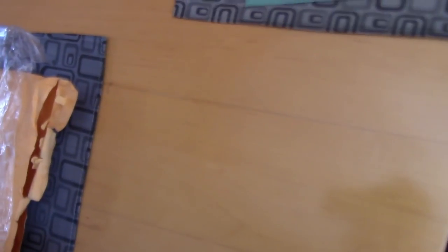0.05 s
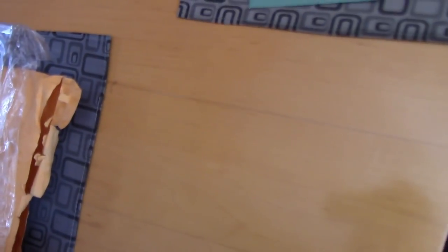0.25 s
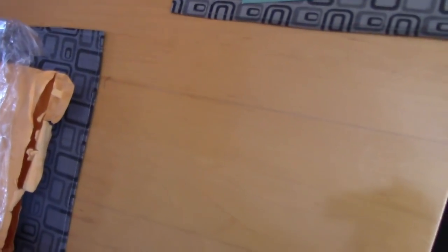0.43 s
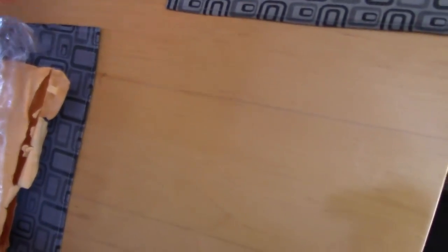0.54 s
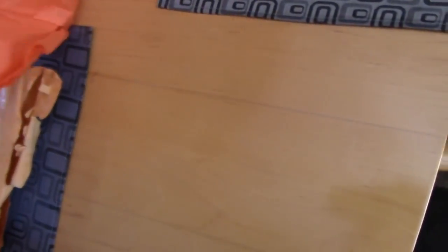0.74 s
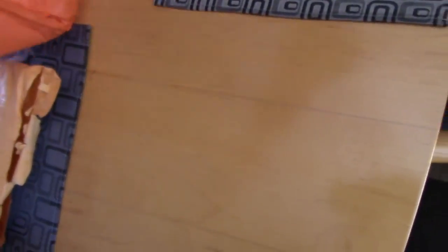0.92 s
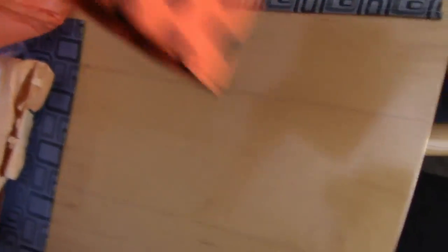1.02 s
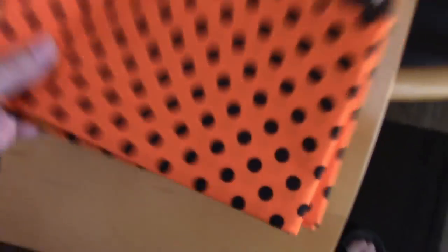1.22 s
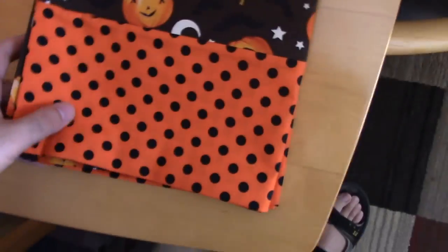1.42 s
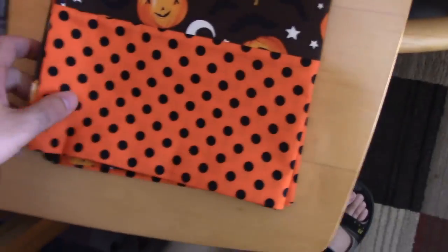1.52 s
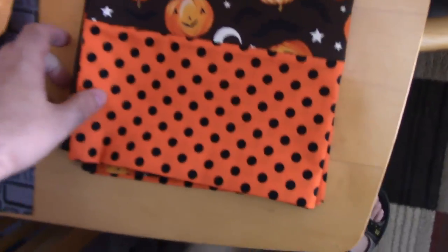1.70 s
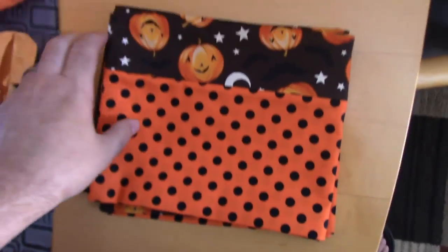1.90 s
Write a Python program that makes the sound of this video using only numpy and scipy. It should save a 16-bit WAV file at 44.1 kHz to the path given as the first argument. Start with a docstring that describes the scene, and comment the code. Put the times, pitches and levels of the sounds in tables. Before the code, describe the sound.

Fabric rasps and flaps softly as it is pulled from a pile in a small, quiet room. The rustle fades, then hand and cloth land on a wooden table with one quick knock and settle.

```python
"""A small, quiet room with a wooden table. A folded piece of stiff cotton is pulled from a pile and carried
over the table. Stick-slip friction makes the weave rasp, while buckling makes the folds flap and the
creases snap. The hand lands with the cloth in a quick double knock that excites the modes of the table
top, and the cloth settles with a faint brush. A noise suppressor thins the faint parts."""
import sys
import numpy as np
from scipy import signal
from scipy.fft import rfft, irfft
from scipy.io import wavfile
from scipy.ndimage import uniform_filter1d, minimum_filter1d

SR = 44100
rng = np.random.default_rng(int(sys.argv[2]) if len(sys.argv) > 2 else 0)


def bounce(signal):
    """Save signal as a 16-bit WAV file at the path given by the first command-line argument."""
    frames = np.transpose(np.atleast_2d(signal))
    limited = np.clip(frames, -1, 1)
    pcm = np.round(limited * 32767).astype(np.int16)
    wavfile.write(sys.argv[1], SR, pcm)


N = 85995

# Envelopes of the rubbing weave and the flapping folds: time_s, relative_level_db
RUB_ENVELOPE = [(0.0, -30), (0.064, -37), (0.096, -31.5), (0.238, -32), (0.252, -24), (0.298, -30.5),
                (0.324, -26), (0.398, -26), (0.416, -17), (0.456, -23.5), (0.492, -24), (0.508, -15),
                (0.544, -18.5), (0.556, -31), (0.676, -56.5), (0.732, -46.5), (0.743, -36), (0.748, -23.5),
                (0.77, -20), (0.866, -40), (0.934, -41), (0.962, -36.5), (0.976, -30.5), (1.008, -31.5),
                (1.02, -38), (1.32, -57), (1.45, -100)]
FLAP_ENVELOPE = [(0.0, -43), (0.1, -51), (0.27, -49), (0.318, -42), (0.408, -40), (0.474, -43),
                 (0.514, -31.5), (0.578, -55.5), (0.66, -61), (0.756, -44.5), (0.904, -53), (1.122, -49.5),
                 (1.4, -58)]
# Spectra of the noisy sounds: frequency_hz, relative_level_db
RUB_SPECTRUM = [(300, -43), (680, -17.5), (880, -4.5), (1450, 0), (2070, -5), (2750, 0), (3900, -3.5),
                (4700, -1), (6500, -5), (10300, -9.5), (13000, -16.5), (15500, -30.5)]
FLAP_SPECTRUM = [(60, -31), (160, -15.5), (255, 0.5), (400, -1.5), (640, -9), (890, -2), (1300, -29.5),
                 (3000, -52.5)]
HOLLOW_SPECTRUM = [(60, -40), (260, -8.5), (520, -12), (760, 8), (900, -13.5), (4000, -60)]  # the cloth leaves the pile
SCRAPE_SPECTRUM = [(600, -20), (1200, -5), (4000, -3), (11000, 4.5), (15000, -13)]  # the last corner scrapes free
SLIDE_SPECTRUM = [(100, -24), (440, -0.5), (730, -11.5), (895, 2.5), (1100, -7), (1460, 10.5), (1750, -4.5),
                  (2200, -13.5), (5000, -14.5), (15000, -48.5)]  # fingers slide on it
BRUSH_SPECTRUM = [(300, -21.5), (3800, -15.5), (5100, 9), (6300, -9), (8000, -0.5), (15000, -25.5)]  # it is lowered
SWISH_SPECTRUM = [(30, -17.5), (200, 1), (620, 5.5), (1500, -12), (2200, -1), (5000, -14.5), (15000, -35.5)]  # noise swells just before the knock and fades under it
THUD_SPECTRUM = [(40, -17.5), (87, 1.5), (170, -1.5), (450, 8), (620, -10), (3000, -62)]  # the layers come down
SETTLE_SPECTRUM = [(100, -6), (272, 10), (750, -17.5), (1100, 6), (1650, 13), (2000, 7), (3050, 5.5),
                   (3700, -14), (5200, -4), (6500, -10), (15000, -23.5)]
TRAIL_SPECTRUM = [(600, -24), (1100, -1), (1600, 2), (2300, -12)]  # the fingers trail off
BACKGROUND_SPECTRUM = [(40, -13), (280, -2.5), (1100, -11.5), (15000, -41)]
# Soft, low bumps, the last two faint ones as the hand lets go: start_s, level_db, pitch_hz, t60_s
BUMPS = [(0.089, -42.5, 271.1, .3), (0.178, -43.5, 420.4, .3), (.21, -43, 560, .25), (.405, -35, 742, .14),
         (.498, -23.5, 272.5, .15), (.503, -20.5, 342.6, .14), (.742, -35, 401.7, .25),
         (.785, -39.5, 315.4, .2), (.91, -44.5, 388, 0.32), (.98, -47, 640, 0.26), (1.086, -38, 552.6, .3),
         (1.092, -43, 226, .18), (1.2, -43.5, 437, .4), (1.3, -48, 420.9, 0.83), (1.689, -48, 169, .3),
         (1.879, -45, 278.3, 0.197)]
# Light strokes of the cloth and the swish: start_s, attack_s, hold_s, release_t60_s, level_db
STROKES = [ (.245, 0.15, 0.072, 0.37, -37), (1.064, 0.0043, 0.0043, 0.028, -40.5),
           (1.072, 0.017, 0.13, 0.64, -43.5), (1.283, 0.0057, 0.02, 0.34, -53),
           (1.372, 0.02, 0.014, 0.23, -27), (1.392, 0.033, 0.095, 0.17, -39),
           (1.532, 0.027, 0.05654, 0.22, -41), (1.66, 0.011, 0.042, 0.22, -51), ]
# Crease snaps: start_s, level_db, pitch_hz
SNAPS = [(0.328, -7, 4560), (0.371, -7, 5000), (0.768, -6, 3100), (0.828, -22.5, 1445),
         (1.033, -22.5, 2590), (1.103, -34, 1383), (1.128, -36, 1510), (1.171, -32, 1470)]
# A padded blow, a hard one and two light rebounds: start_s, gain_db, contact_bandwidth_hz
BLOWS = [(1.3951, 4, 1670), (1.4011, -2, 10180), (1.4141, -15.5, 3800), (1.4349, -14, 5000)]
# Modes of the table top: frequency_hz, relative_level_db, t60_s
TABLE_MODES = [(262.8, -23, 0.28), (439.3, -17.5, 0.14), (596, -15.5, 0.0966), (722, -4.5, 0.021),
               (910.8, -3, 0.011), (1089, -15.5, 0.11), (1270, -8, 0.025), (1794, -4.5, 0.01),
               (3030, -11.5, 0.0078), (4500, -6, 0.0036), (7160, -6, 0.0014)]
# Reverberation time of the room: frequency_hz, t60_s
ROOM_T60 = [(100, 0.32), (300, 0.5056), (700, 0.4722), (1300, 0.475), (3000, 0.58), (8000, 0.56)]
# Spectrum of the reverberation: frequency_hz, relative_level_db
ROOM_SPECTRUM = [(80, -3.5), (270, -4), (500, 11), (800, 0), (1500, 0.5), (3000, -0.5), (12000, -4.5)]
# Nominal threshold of the noise suppressor: frequency_hz, level_db
GATE_THRESHOLD = [(60, -67), (270, -63.5), (480, -57), (700, -54.5), (1050, -69), (1600, -66), (2100, -64),
                  (3000, -70), (4100, -62), (5200, -72), (15000, -86)]


def undb(db):
    """Amplitude ratio of a level in decibels."""
    return 10 ** (np.asarray(db) / 20)


def unit(x):
    """Normalisation to an rms of 1."""
    return x / np.sqrt(np.mean(x ** 2) + 1e-18)


def clock():
    """Time of every sample in seconds."""
    return np.arange(N) / SR


def decay(age, t60):
    """Exponential damping: 60 dB lost in t60 seconds."""
    return np.exp(-np.log(1000) * age / t60)


def along(table, at):
    """Linear interpolation in a two-column table."""
    return np.interp(at, *np.array(table, float).T)


def on_log(points, hz):
    """Interpolation on a logarithmic frequency axis."""
    freqs, values = np.array(points, float).T
    return np.interp(np.log(np.maximum(hz, 1)), np.log(freqs), values)


def colour(x, spectrum):
    """Zero-phase filtering by a spectral envelope."""
    size = 2 * len(x)
    gain = undb(on_log(spectrum, np.fft.rfftfreq(size, 1 / SR)))
    return irfft(rfft(x, size) * gain, size)[:len(x)]


def wander(rate_hz):
    """Random modulation: interpolated Gaussian steps with an rms of 1."""
    steps = rng.standard_normal(N)
    return unit(np.interp(clock() * rate_hz, np.arange(N), steps))


def slips(spectrum, per_s, scatter_db, flurry_hz=172.6, flurry_db=0.9):
    """Stick-slip friction: threads catch and let go in flurries of clicks, filtered and set to rms 1."""
    chance = np.clip(per_s / SR, 1e-4, 1)
    size = undb(scatter_db * np.minimum(rng.exponential(size=N), 5))
    slipping = rng.random(N) < chance
    clicks = slipping * rng.choice([-1, 1], N) * size / np.sqrt(chance)  # same power at any rate
    flurries = undb(flurry_db * wander(flurry_hz))
    return unit(colour(clicks * flurries, spectrum))


def rubbing(peak_slips_per_s=16000, gain_db=-1):
    """Friction of cloth on cloth: the slip rate follows a power law of the rubbing effort."""
    effort = undb(along(RUB_ENVELOPE, clock()))
    per_s = peak_slips_per_s * (effort / effort.max()) ** 0.28
    return undb(gain_db) * effort * slips(RUB_SPECTRUM, per_s, scatter_db=3)


def flapping(gain_db=0.5):
    """Buckling of the folds: random pulses merge into a soft, hollow flutter."""
    envelope = undb(gain_db + along(FLAP_ENVELOPE, clock()))
    return envelope * slips(FLAP_SPECTRUM, per_s=1700, scatter_db=0.5)


def bumps(rise_s=0.009, jitter_rad=0.15):
    """Damped oscillation: soft bumps and faint blips, each at its own low pitch."""
    out = np.zeros(N)
    for start, db, hz, t60 in BUMPS:
        age = np.maximum(clock() - start, 0)
        ring = np.sin(2 * np.pi * hz * age + jitter_rad * wander(rate_hz=90))
        out += undb(db) * ring * (1 - np.exp(-age / rise_s)) * decay(age, t60)
    return out


def stroke(shape, spectrum, per_s, scatter_db):
    """Shot noise under an envelope: sparse clicks swell, hold and die away, as in a light slide."""
    start, attack, hold, t60, db = shape
    age = clock() - start
    envelope = np.clip(age / attack, 0, 1) * decay(np.maximum(age - attack - hold, 0), t60)
    return undb(db) * envelope * slips(spectrum, per_s, scatter_db)


def snaps(rise_s=0.00011, decay_cycles=3.2, jitter_rad=0.3):
    """Snap-through buckling: taut creases pop over and ring for a few rough cycles."""
    out = np.zeros(N)
    for start, db, hz in SNAPS:
        age = np.maximum(clock() - start, 0)
        ring = np.sin(2 * np.pi * hz * age + jitter_rad * wander(hz))
        out += undb(db) * ring * (1 - np.exp(-age / rise_s)) * np.exp(-age * hz / decay_cycles)
    return signal.sosfilt(signal.butter(4, 800, "high", fs=SR, output="sos"), out)


def knock(crack_db=-16, crack_s=0.0019):
    """Modal response to impact: blows ring the table top, and softer contact excites less treble."""
    t, out = clock(), np.zeros(N)
    wood = sum((-1) ** k * undb(db) * np.sin(2 * np.pi * hz * t) * decay(t, t60)
               for k, (hz, db, t60) in enumerate(TABLE_MODES))
    for start, db, contact_hz in BLOWS:
        crack = undb(crack_db) * rng.standard_normal(N) * np.exp(-t / crack_s)
        hit = signal.sosfilt(signal.butter(2, contact_hz, fs=SR, output="sos"), wood + crack)
        out += undb(db) * np.interp(t - start, t, hit, left=0)
    return out


def reverberation(x, gain_db=-10.5, onset_s=0.0034):
    """Diffuse reflection in a small room: each octave decays at its own rate."""
    t, freqs = clock(), np.fft.rfftfreq(N, 1 / SR)
    noise, tail = rfft(rng.standard_normal(N)), np.zeros(N)
    for hz in 31.25 * 2 ** np.arange(10):
        octave = np.maximum(1 - abs(np.log2(np.maximum(freqs, 1) / hz)), 0)
        tail += irfft(noise * octave, N) * decay(t, on_log(ROOM_T60, hz))
    fade_in = np.clip(2 * t / onset_s - 1, 0, 1)
    response = colour(tail / np.sqrt(np.sum(tail ** 2)), ROOM_SPECTRUM) * fade_in
    return undb(gain_db) * signal.fftconvolve(x, response)[:N]


def suppress(x, depth_db=-36, knee_db=0.7, ripple_db=4.5):
    """Spectral gating: narrow bands open only near times above threshold, so faint sounds turn glassy."""
    framing = dict(fs=SR, nperseg=2048, noverlap=1536)
    hz, _, bands = signal.stft(x, **framing)
    ripple = unit(uniform_filter1d(rng.standard_normal(len(hz)), size=9))
    threshold_db = on_log(GATE_THRESHOLD, hz) + ripple_db * ripple
    excess_db = 20 * np.log10(abs(bands) + 1e-12) - threshold_db[:, None]
    lasting = minimum_filter1d(excess_db, size=2)  # a band must pass for two frames
    held = -minimum_filter1d(-lasting, size=5)  # and opens for at least five
    opening = uniform_filter1d(0.5 + 0.5 * np.tanh(held / (2 * knee_db)), size=3)
    gain = np.maximum(opening, undb(depth_db))
    return signal.istft(bands * gain, **framing)[1][..., :N]


def scene():
    """Superposition of cloth, table and reverberation over a very faint background."""
    hollow, scrape, slide, brush, swish, thud, settle, trail = STROKES
    pulling = stroke(hollow, HOLLOW_SPECTRUM, per_s=1800, scatter_db=-0.5)
    pulling += stroke(scrape, SCRAPE_SPECTRUM, per_s=4300, scatter_db=3.5)
    carrying = stroke(slide, SLIDE_SPECTRUM, per_s=1400, scatter_db=1.5)
    carrying += stroke(brush, BRUSH_SPECTRUM, per_s=4300, scatter_db=6)
    rustle = rubbing() + flapping() + snaps() + bumps() + pulling + carrying
    swishing = stroke(swish, SWISH_SPECTRUM, per_s=7600, scatter_db=4)
    landing = stroke(thud, THUD_SPECTRUM, per_s=5200, scatter_db=3)
    settling = stroke(settle, SETTLE_SPECTRUM, per_s=2600, scatter_db=-3.5)
    leaving = stroke(trail, TRAIL_SPECTRUM, per_s=1200, scatter_db=0)
    table = knock()
    background = undb(-79) * unit(colour(rng.standard_normal(N), BACKGROUND_SPECTRUM))
    room = reverberation(table + undb(3.5) * rustle)
    return (rustle + swishing + table + landing + settling + leaving + room + background)[None]


def record(dry, ceiling=1.1, cutoff_hz=15700):
    """Soft saturation rounds the knock; gating thins faint sounds and a low-pass limits the bandwidth."""
    rounded = ceiling * np.tanh(dry / ceiling)
    low_pass = signal.ellip(10, 0.2, 80, cutoff_hz, fs=SR, output="sos")
    return signal.sosfilt(low_pass, suppress(rounded))


dry = scene()
out = record(dry)
bounce(out)
```